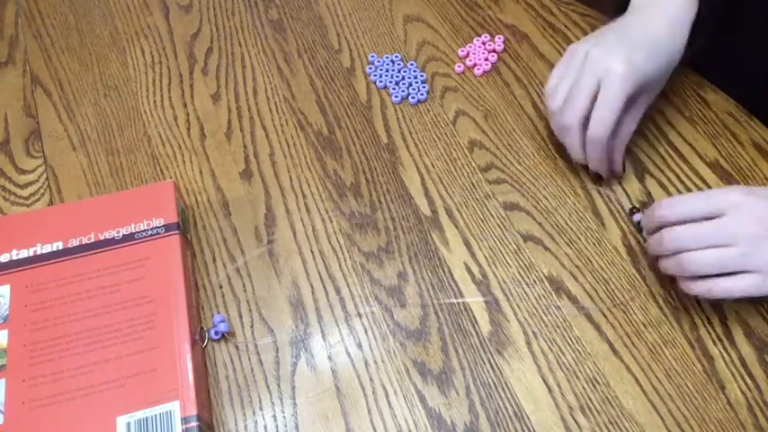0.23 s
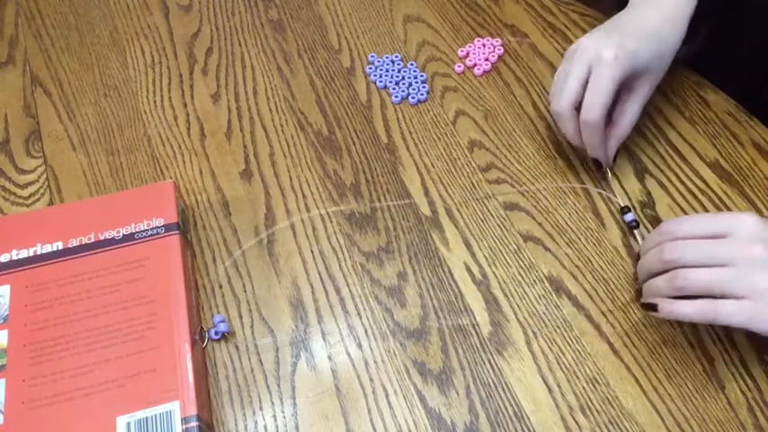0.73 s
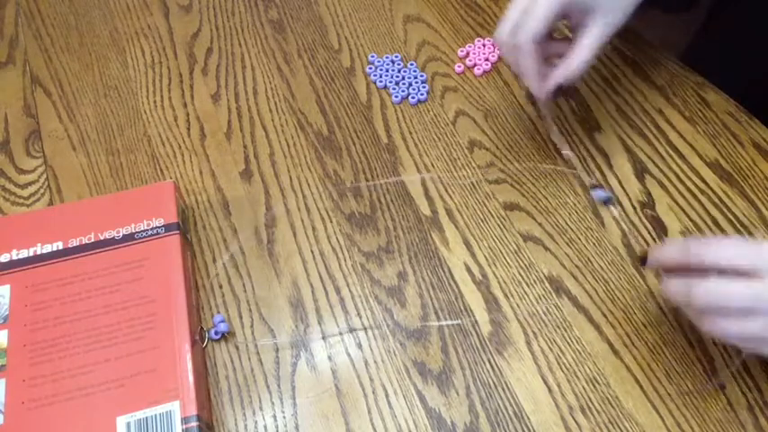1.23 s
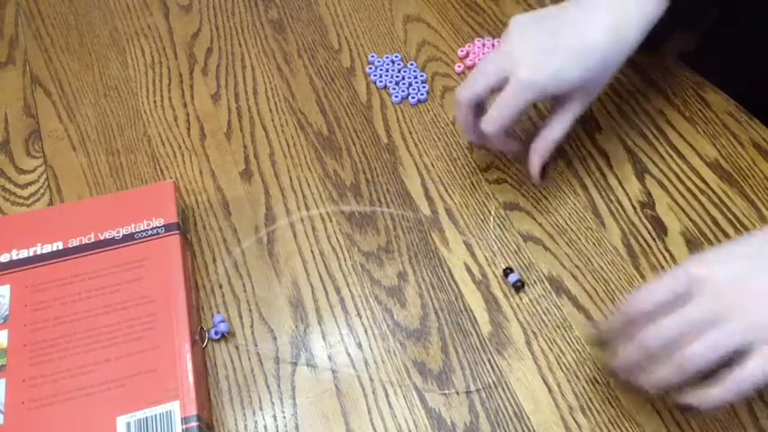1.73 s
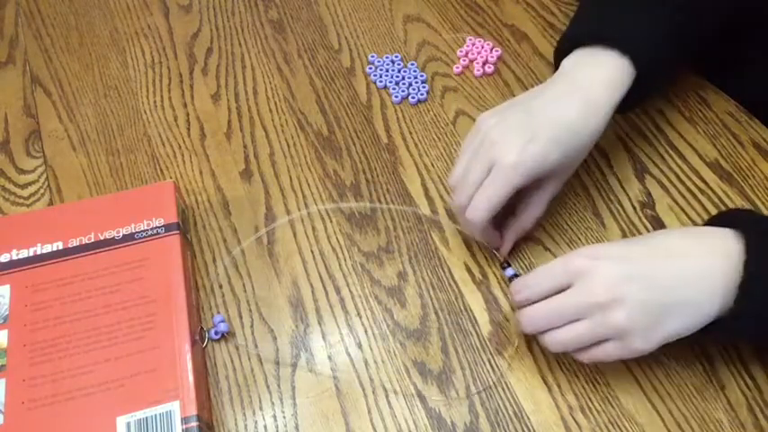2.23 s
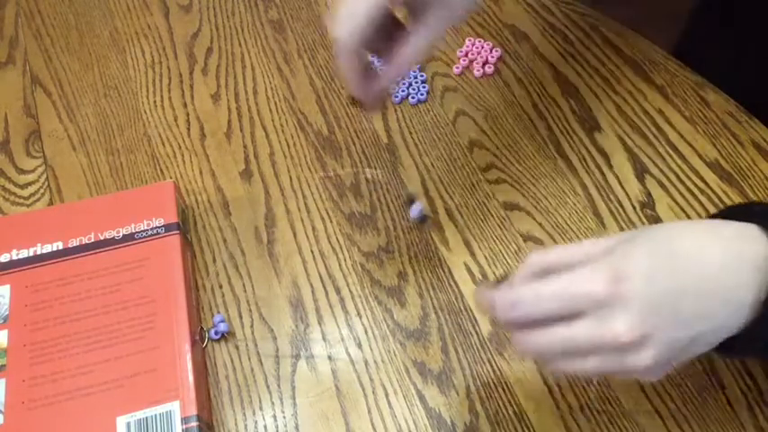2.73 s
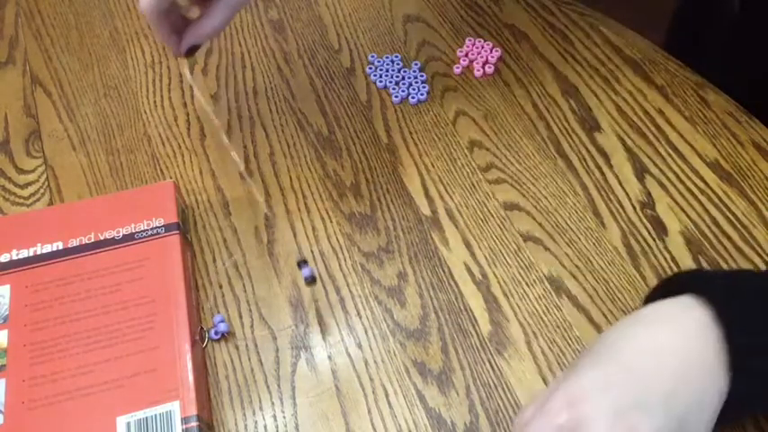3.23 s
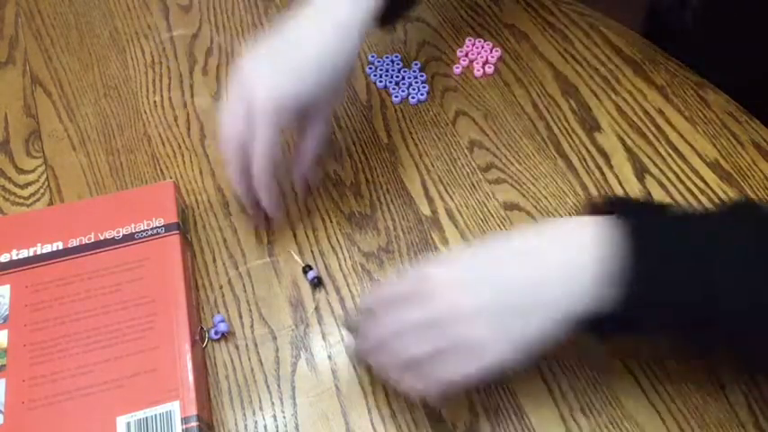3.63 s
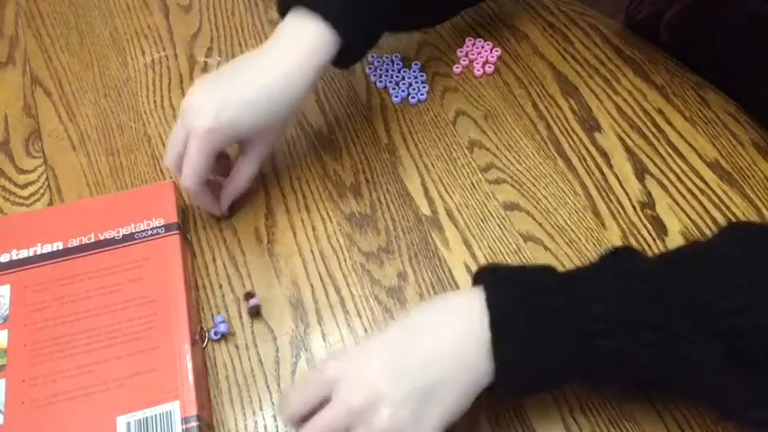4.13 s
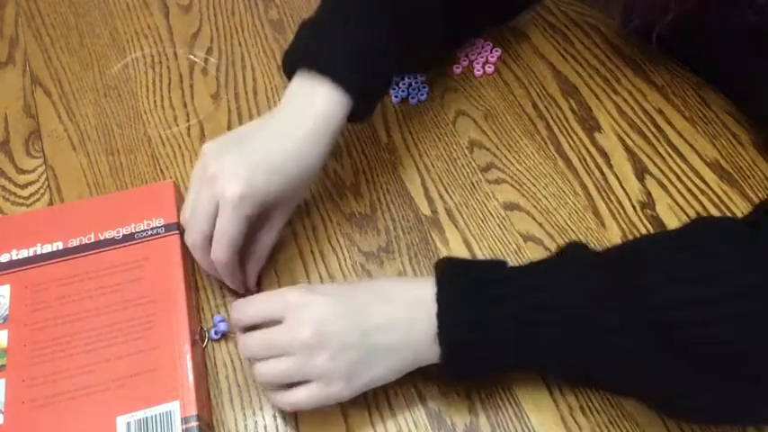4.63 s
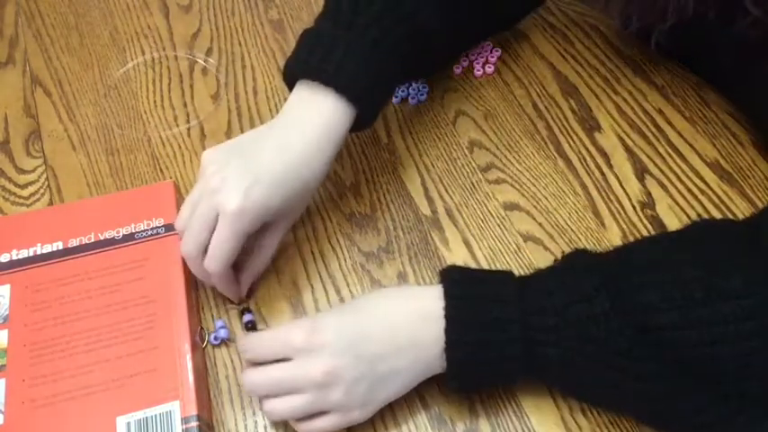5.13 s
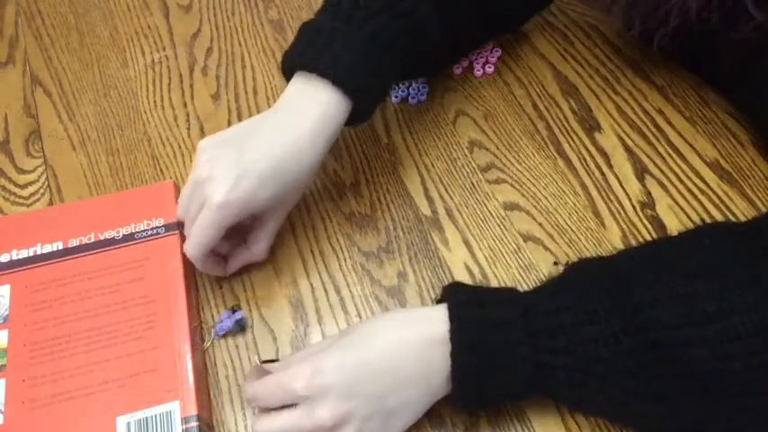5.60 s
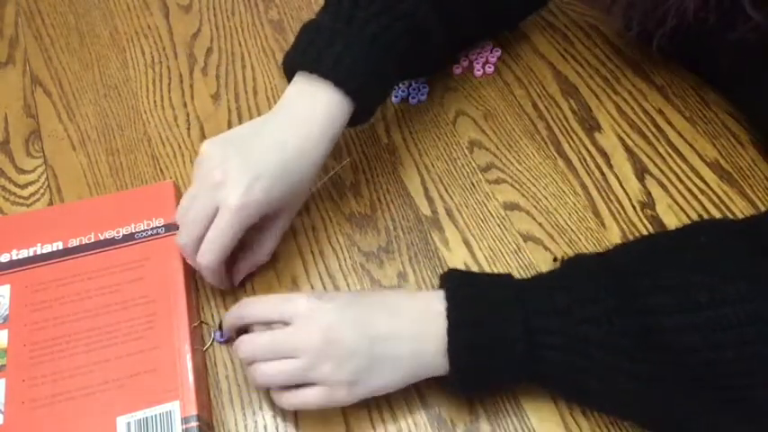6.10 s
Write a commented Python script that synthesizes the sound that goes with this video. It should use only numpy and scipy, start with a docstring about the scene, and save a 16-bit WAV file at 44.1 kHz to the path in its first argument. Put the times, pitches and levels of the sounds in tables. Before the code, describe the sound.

Right at the start, hands land on a wooden table with dull, briefly ringing knocks, while plastic beads click sharply and slide along the grain. Another short scrape comes at about 0.4 seconds, then only faint handling. From 1.5 to 2 seconds there is a flurry of bead and fingernail clicks with three quick slides and a soft knock. A lull with a few tiny ticks follows. At 3.4 seconds a sharp click leads into a brief scrape, and dull knocks land around 3.7. Lighter clicks are scattered from 4 to 5 seconds. A click and a low thump come at 5.6, with soft rubbing and a few more ticks until the end, near 6.3 seconds. Throughout, an appliance hums low, throbbing three to four times a second and swelling and fading over soft room air. The handling sounds close, with the short echo of a small room.

```python
"""Threading beads at a wooden table

Two hands thread plastic beads on a lace in a small room. Beads and fingernails click on the top and
on each other, hands land with dull knocks that set the wood ringing, and the string of beads slides
along the grain in short strokes. Behind it all, an appliance hums and throbs over soft room air."""
import sys
import numpy as np
from scipy import signal
from scipy.fft import rfft, irfft
from scipy.io import wavfile
from scipy.ndimage import uniform_filter1d

SR = 44100
rng = np.random.default_rng(int(sys.argv[2]) if len(sys.argv) > 2 else 0)


def store_pcm(level_fs):
    """Save levels as 16-bit WAV."""
    pcm = np.round(np.clip(level_fs, -1, 1) * 32767).astype(np.int16)
    wavfile.write(sys.argv[1], SR, np.atleast_2d(pcm).T)


N = 280476

# tone of the room air: frequency_hz, gain_db
AIR_EQ = [(20, -46), (40, -20), (60, -1), (90, -3), (140, -1.5), (200, 1), (232, -3.5), (305, -5),
          (409, -5.5), (482, -7), (950, -18.5), (1710, -20), (1870, -22), (3130, -27.5), (12600, -34),
          (16000, -43)]
# the appliance's steady partials: pitch_hz, level_db
HUM_PARTIALS = [(58.8, -66.5), (119.8, -54), (177.6, -68.5), (238.5, -67.5), (355.3, -68), (473.7, -77)]
# slow fader ride on the throbbing tone: time_s, level_db
THROB_LEVELS = [(0, -53), (.4, -56.5), (.75, -51), (1.2, -51.5), (1.6, -66.5), (2.7, -63), (3.3, -53),
                (3.6, -54.5), (3.85, -61), (4.15, -49), (4.8, -61.5), (5.3, -62), (6.36, -58.5)]
# pace of the throb, a little quicker late on: time_s, rate_hz
THROB_RATES = [(4.2, 3.5), (4.6, 3.82)]
# decay of the room: frequency_hz, t60_s
REVERB_DECAY = [(150, 0.02), (500, 0.38), (1500, 0.34), (4000, 0.31), (8000, 0.15), (15000, 0.2)]
# tone of the room's echoes: frequency_hz, gain_db
REVERB_EQ = [(150, -9.5), (600, 1.5), (1500, -6), (3500, -9), (7000, -12), (14000, -13.5)]
# strokes of beads and lace along the wood: start_s, length_s, effort_db
SLIDE_STROKES = [(0, 0.27, -58.5), (0.405, 0.15, -57.5), (0.777, 0.046, -61), (1.475, .06, -58.5),
                 (1.63, .08, -55.5), (1.861, .11, -53.5), (3.42, 0.064, -53), (3.599, .22, -62.5),
                 (4.17, .13, -62.5), (5.49, 0.35, -62.5), (6.036, .3, -63.5)]
# tone of the sliding: frequency_hz, gain_db
SLIDE_EQ = [(500, 2), (1400, -1), (2300, -4), (3100, 3), (4200, 1), (5500, -2), (8000, -7.5), (13000, -13),
            (16000, -19)]
# resonances of the tabletop: pitch_hz, gain_db, t60_s
TABLETOP_MODES = [(83.6, -13, 0.61), (190, -6, 0.21), (217.6, 1.5, 0.1), (244, 1, .12), (277.3, 1, 0.12),
                  (379, -4.5, 0.091), (414.5, -2.5, 0.16), (507, -0.5, 0.044), (628, -2, 0.06),
                  (772, -3, 0.043), (1141, -2.5, 0.048), (1650, -5.5, 0.097)]
# hands and forearms landing on the table: start_s, strength_db, brightness_hz
HAND_KNOCKS = [(0.075, -27, 407), (0.088, -35.5, 700), (0.094, -25, 650), (0.146, -38.5, 400),
               (0.22, -31.5, 90), (1.594, -34.5, 270), (1.85, -46.5, 500), (1.905, -45, 700),
               (3.723, -36, 920), (3.731, -34.5, 900), (3.79, -31.5, 120), (5.641, -30, 80)]
# tone shared by all clicks: frequency_hz, gain_db
CLICK_EQ = [(200, 6), (800, -6.5), (1300, 2.5), (1900, -3.5), (2400, -4), (3000, 6), (4300, 5), (5800, 3.5),
            (7200, 4.5), (9500, 0), (13000, -3), (16000, -11.5)]
# bead and nail clicks; wood and treble are relative trims on the body and the top end:
# start_s, strength_db, wood_db, treble_db, ring_hz, reverb_send_db
BEAD_CLICKS = [(0.058, -46.5, -25, -13, 3900, 14), (0.067, -41.5, -17, -6, 3800, 10),
               (0.0941, -25.5, -20, -8, 5230, 11.5), (0.102, -28.5, -19, -12, 3600, 7.5),
               (0.1803, -44, -15, -24, 3120, 9.5), (0.2914, -42, -17.5, -26, 4530, 9),
               (0.3913, -51, -25, -7, 4140, 16.5), (0.4618, -49.5, -19, -32, 4500, 7),
               (1.1943, -55, -5, -15, 6690, 6), (1.4664, -48.5, -17, -33, 3230, 10),
               (1.4746, -47, -15, -31, 3230, 7), (1.497, -52, -13, -23, 4220, -3),
               (1.579, -53, -8, -2, 5770, 17), (1.6215, -35, -19, -2.5, 6900, 10.5),
               (1.6641, -28, -19, -13, 4240, 6), (1.8504, -44.5, -18, 1, 6700, 11),
               (1.8679, -40.5, -23, -1, 6970, 7), (1.8754, -44.5, -14, 6, 4220, 14),
               (1.9033, -43.5, -12.5, -15, 4040, 11), (2.3582, -55, -18, -9.5, 4170, 6),
               (2.6705, -53, -20, 6, 2990, 12), (3.3789, -25, -19.5, -11, 4700, 5),
               (3.466, -35.5, -22, -3.5, 6870, 8), (3.4852, -47.5, -9, -9, 4630, 5),
               (3.5307, -48, -16, -18, 3900, 10), (3.705, -43, -14, -31, 3940, 10.5),
               (3.7272, -47, -7, -30, 4100, 4), (3.7987, -47, -12, -29, 3900, 9.5),
               (4.0335, -36, -7, -9.5, 3500, 6.5), (4.2584, -48.5, -21, -9, 3060, 11.5),
               (4.2836, -46, -10, -10, 5400, 6), (4.372, -54.5, -15, -10, 2970, 6),
               (4.4941, -46.5, -11.5, -25, 3020, 6), (4.9272, -45, -13, -15, 5400, 8),
               (4.9469, -40, -11.5, -20, 3780, 5), (5.5906, -35.5, -11, -15, 7040, -0.5),
               (5.7349, -58, -13, -10, 3880, 10), (5.9648, -55, -13, -10, 4150, 5),
               (6.0592, -38, -9, -44, 3290, 6.5), (6.2596, -46.5, -0.5, -38, 4300, 3)]

THROB_HZ, THROB_CREST_S, THROB_DEPTH = 145, 0.428, 0.61   # pitch, time of one crest, share of swell
FINGERING_DB = -66   # effort of the light rub between strokes


def from_db(db):
    """Decibels to gain."""
    return 10 ** (np.asarray(db) / 20)


def unit_rms(x):
    """Scale to rms 1."""
    return x / np.sqrt(np.mean(x ** 2) + 1e-20)


def automation(rows):
    """A breakpoint curve's value at every sample."""
    return np.interp(np.arange(N) / SR, *np.transpose(rows))


def at_hz(points, hz):
    """Read a curve on a log-frequency axis."""
    points = np.array(points)
    return np.interp(np.log(np.maximum(hz, 1)), np.log(points[:, 0]), points[:, 1])


def equalise(x, eq):
    """Shape a signal with a smooth EQ curve."""
    hz = np.fft.rfftfreq(len(x), 1 / SR)
    return irfft(rfft(x) * from_db(at_hz(eq, hz)), len(x))


def drift(rate_hz):
    """A slow random wobble of rms 1."""
    hz = np.fft.rfftfreq(N, 1 / SR)
    return unit_rms(irfft(rfft(rng.standard_normal(N)) / (1 + (hz / rate_hz) ** 2), N))


def room_air(level_db=-54):
    """An even bed of noise: a low rush that thins to a hiss."""
    return from_db(level_db) * unit_rms(equalise(rng.standard_normal(N), AIR_EQ))


def appliance_hum(waver_db=1.5, wander_rad=0.15):
    """Motor partials and one throbbing tone, each wavering slightly in level and phase."""
    t = np.arange(N) / SR
    beats = np.cumsum(automation(THROB_RATES)) / SR
    beats -= np.interp(THROB_CREST_S, t, beats)
    throb = (1 + THROB_DEPTH * np.cos(2 * np.pi * beats)) * from_db(automation(THROB_LEVELS))
    partials = [(hz, from_db(level_db)) for hz, level_db in HUM_PARTIALS] + [(THROB_HZ, throb)]
    out = np.zeros(N)
    for hz, level in partials:
        phase = 2 * np.pi * (hz * t + rng.random()) + wander_rad * drift(0.9)
        out += np.sqrt(2) * level * from_db(waver_db * drift(2.0)) * np.sin(phase)
    return out


def room_reverb(send, build_s=0.0011):
    """A small room's diffuse echoes: quick to build, longest in the mids, nearly dead in the bass."""
    t = np.arange(SR // 2) / SR
    hz = np.fft.rfftfreq(len(t), 1 / SR)
    white = rfft(rng.standard_normal(len(t))) / np.sqrt(SR)
    edges_hz = np.geomspace(50, 20000, 15)
    echoes = 0
    for low, high in zip(edges_hz, edges_hz[1:]):
        centre_hz = np.sqrt(low * high)
        band = irfft(white * (hz >= low) * (hz < high), len(t))
        t60_s = at_hz(REVERB_DECAY, centre_hz)
        decay = from_db(-60 * t / t60_s) * np.sqrt(np.log(1e6) / t60_s)   # same energy at any length
        echoes += band * decay * from_db(at_hz(REVERB_EQ, centre_hz))
    return signal.fftconvolve(send, echoes * (1 - np.exp(-t / build_s)))[:N]


def rubbing_effort(attack_s=0.011, release_s=0.038):
    """How hard the beads are rubbed: each stroke rises, holds and dies back to the light fingering."""
    t = np.arange(N) / SR
    effort = np.full(N, from_db(FINGERING_DB))
    for start_s, length_s, effort_db in SLIDE_STROKES:
        rise = np.clip((t - start_s) / attack_s, 0, 1)
        fall = np.exp(-np.maximum(t - start_s - length_s, 0) / release_s)
        effort = np.maximum(effort, from_db(effort_db) * rise * fall)
    return effort


def bead_slide(effort, catches_per_s=350, gain_db=-3):
    """Beads catch on the wood grain in tiny ticks over an equally strong smooth rub."""
    sizes_db = np.minimum(rng.exponential(1, N), 4)
    ticks = from_db(sizes_db) * rng.choice([-1, 1], N)
    catches = unit_rms(ticks * (rng.random(N) < catches_per_s / SR))
    rub = rng.standard_normal(N)
    friction = unit_rms(equalise(catches + rub, SLIDE_EQ))
    return friction * effort * from_db(gain_db)


def place(track, start_s, sound):
    """Mix a one-shot into a track."""
    start = max(round(start_s * SR), 0)
    track[start:start + len(sound)] += sound[:N - start]


def plastic_click(wood_db, treble_db, ring_hz, chatter_s=0.0022, ring_s=0.0019, ring_db=-7, size=2048):
    """A hard snap, a few ms of chatter on the wood and the bead's short ring; energy 1."""
    t, hz = np.arange(size) / SR, np.fft.rfftfreq(size, 1 / SR)
    contact = rng.standard_normal(size) * np.exp(-t / chatter_s)
    contact[0] = 3.56   # the snap
    spectrum = rfft(contact)
    # keep the chatter's fine ripple and leave the broad tone to the EQ
    spectrum /= np.sqrt(uniform_filter1d(abs(spectrum) ** 2, size=90))
    hardness_db = at_hz([(1900, wood_db + 17.5), (3200, 0), (6500, 0), (11000, treble_db + 11.0)], hz)
    low_cut_db = -10 * np.log10(1 + (900 / (hz + 1)) ** 4)   # rolls off below 900 Hz
    tick = irfft(spectrum * from_db(at_hz(CLICK_EQ, hz) + hardness_db + low_cut_db))
    ring = np.sin(2 * np.pi * ring_hz * t) * np.exp(-t / ring_s)
    click = unit_rms(tick) + from_db(ring_db) * unit_rms(ring)
    return unit_rms(np.roll(click, size // 64)) / np.sqrt(size)   # short lead-in for the EQ's pre-ring


def bead_jostle(effort, resting_per_s=4, gain_db=25, vary_db=1.5, spread_octaves=0.28):
    """Beads on the lace touch at random, more often and harder as the rubbing grows."""
    out = np.zeros(N)
    touches_per_s = resting_per_s * effort / from_db(FINGERING_DB)
    for i in np.flatnonzero(rng.random(N) < touches_per_s / SR):
        ring_hz = 4430 * 2 ** (spread_octaves * rng.standard_normal())
        strength = effort[i] * from_db(gain_db + vary_db * rng.standard_normal())
        place(out, i / SR, strength * plastic_click(wood_db=-14, treble_db=-7, ring_hz=ring_hz))
    return out


def hand_knocks(gain_db=-4, vary_db=3.5, attack_s=0.00019):
    """A soft push sets the tabletop ringing; a fleshier contact dulls the upper modes."""
    out, t = np.zeros(N), np.arange(SR // 3) / SR
    hz, mode_db, t60_s = np.transpose(TABLETOP_MODES)[:, :, None]
    polarity = (-1) ** np.arange(len(hz))[:, None]
    envelopes = from_db(-60 * t / t60_s) * (1 - np.exp(-t / attack_s))
    modes = polarity * np.sin(2 * np.pi * hz * t) * envelopes
    for start_s, strength_db, brightness_hz in HAND_KNOCKS:
        strength = from_db(strength_db + gain_db + mode_db + vary_db * rng.standard_normal(hz.shape))
        low_pass = 1 / np.hypot(1, (hz / brightness_hz) ** 2)
        place(out, start_s, np.sum(modes * strength * low_pass, axis=0))
    return out


def bead_clicks(gain_db=21, rebound_s=0.004, rebound_db=-16.5):
    """Beads and nails strike, then touch again softly; gives the direct sound and a reverb send."""
    direct, send = np.zeros(N), np.zeros(N)
    for start_s, strength_db, wood_db, treble_db, ring_hz, send_db in BEAD_CLICKS:
        contacts = [(0, 0), (rebound_s * rng.uniform(.5, 1.5), rebound_db)]
        for delay_s, drop_db in contacts:
            click = from_db(strength_db + drop_db + gain_db) * plastic_click(wood_db, treble_db, ring_hz)
            place(direct, start_s + delay_s, click)
            place(send, start_s + delay_s, from_db(send_db) * click)
    return direct, send


def scene():
    """A mono mix: clicks, handling and their reverb over the bed of hum and air."""
    background = appliance_hum() + room_air()
    clicks, click_send = bead_clicks()
    effort = rubbing_effort()
    handling = hand_knocks() + bead_slide(effort) + bead_jostle(effort)
    reverb = room_reverb(click_send + handling)
    return (background + reverb + handling + clicks)[None]


def record(dry, cutoff_hz=16000):
    """A steep low-pass takes off the very top."""
    return signal.sosfilt(signal.ellip(10, .2, 70, cutoff_hz, fs=SR, output="sos"), dry)


dry = scene()
out = record(dry)
store_pcm(out)
```